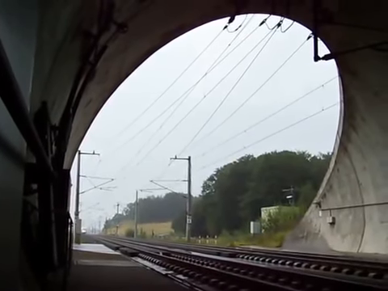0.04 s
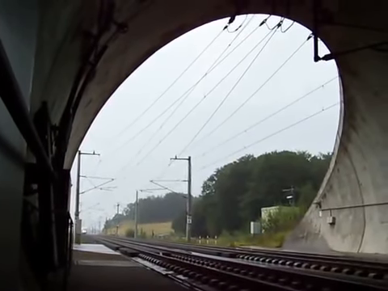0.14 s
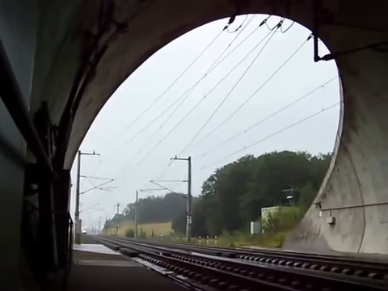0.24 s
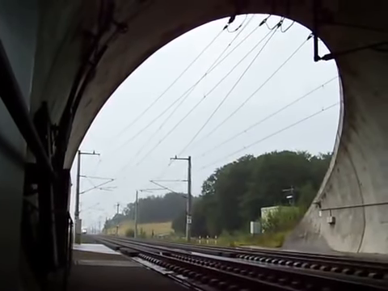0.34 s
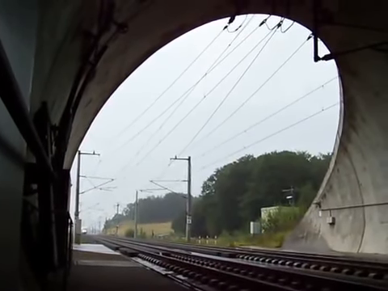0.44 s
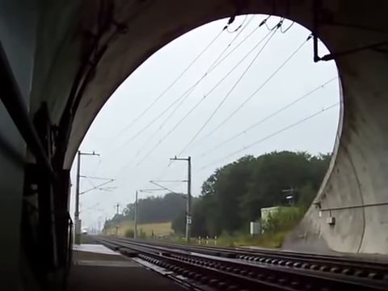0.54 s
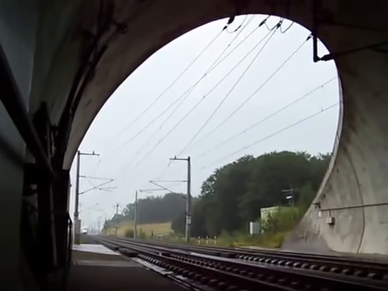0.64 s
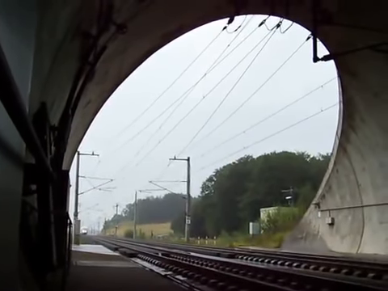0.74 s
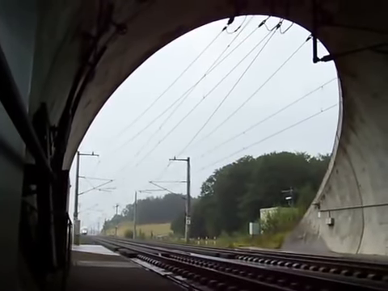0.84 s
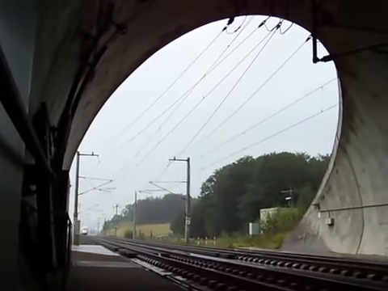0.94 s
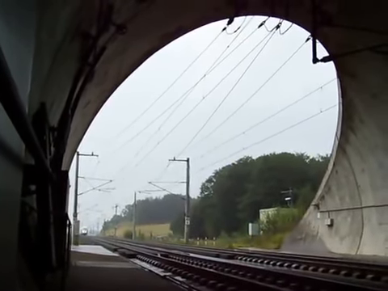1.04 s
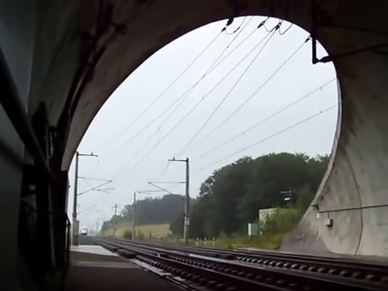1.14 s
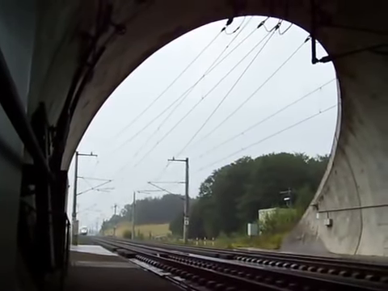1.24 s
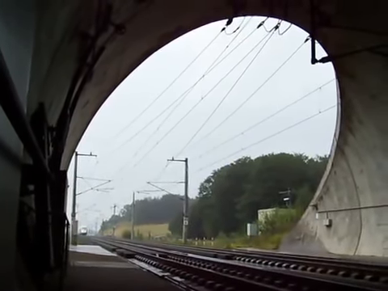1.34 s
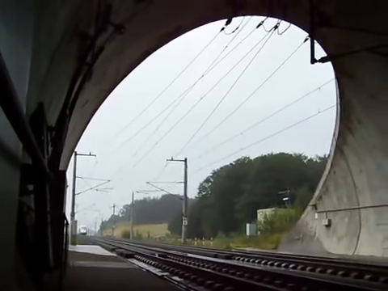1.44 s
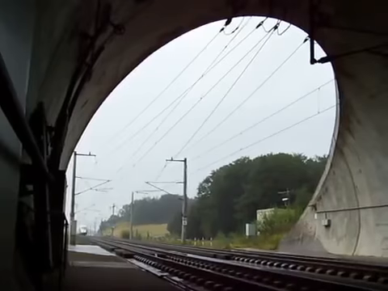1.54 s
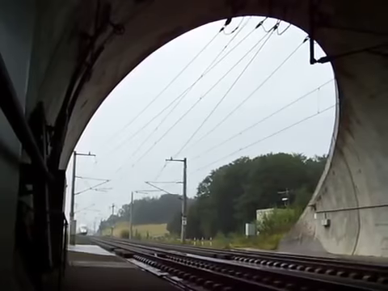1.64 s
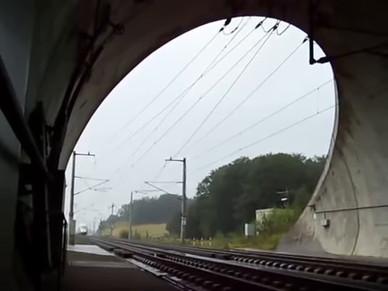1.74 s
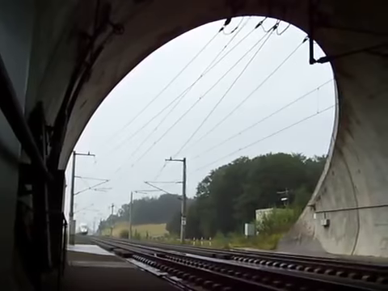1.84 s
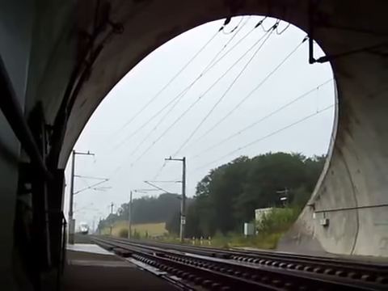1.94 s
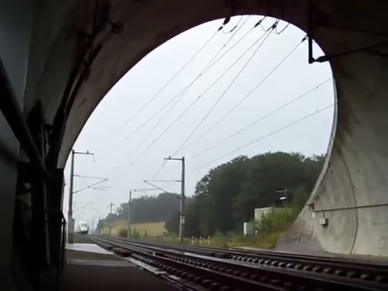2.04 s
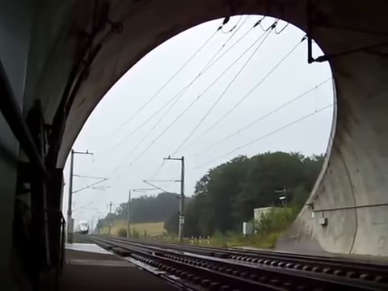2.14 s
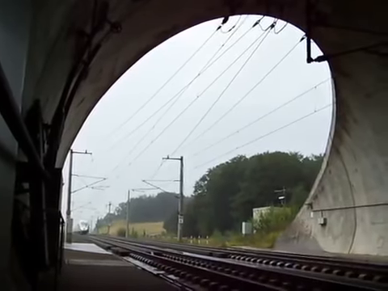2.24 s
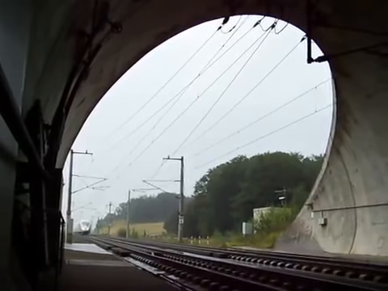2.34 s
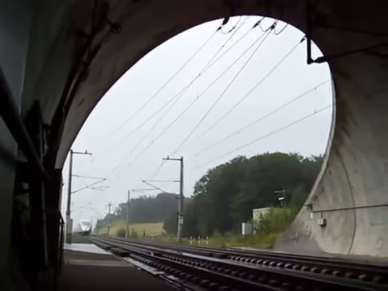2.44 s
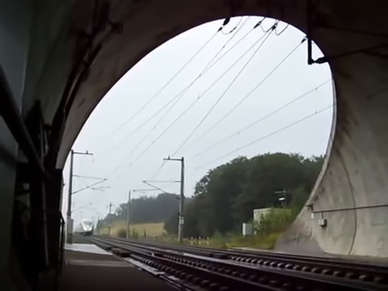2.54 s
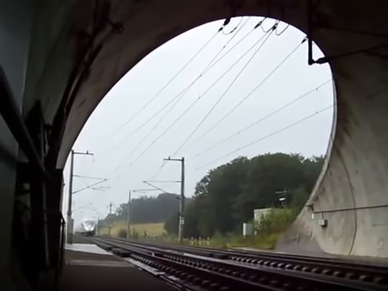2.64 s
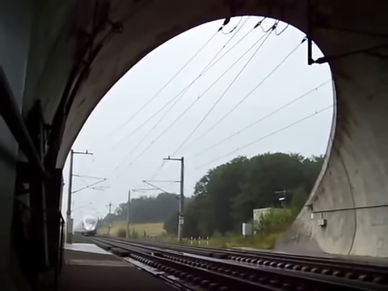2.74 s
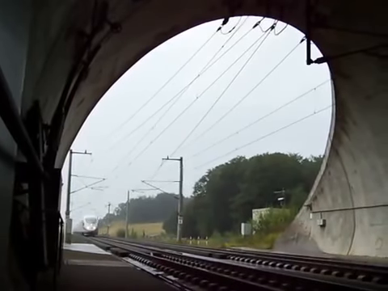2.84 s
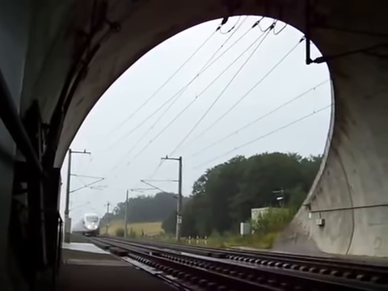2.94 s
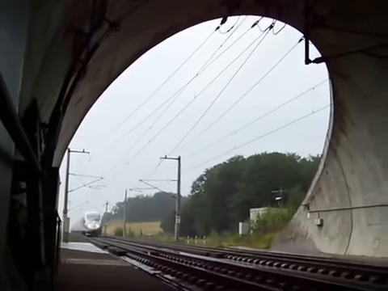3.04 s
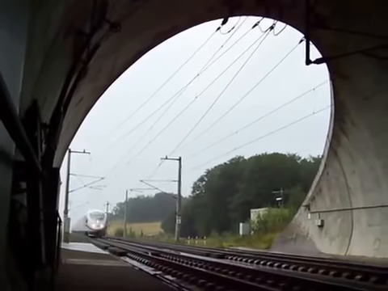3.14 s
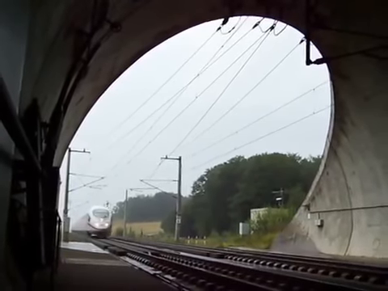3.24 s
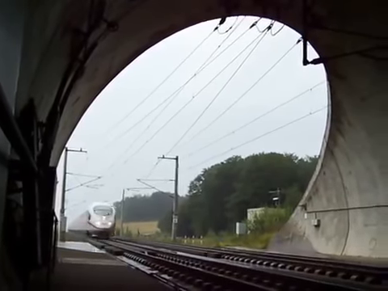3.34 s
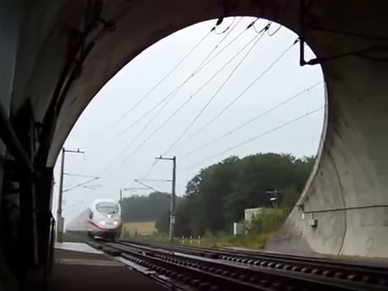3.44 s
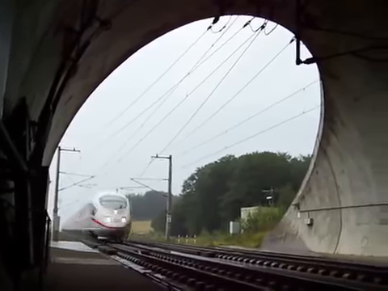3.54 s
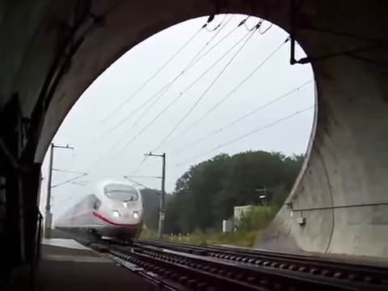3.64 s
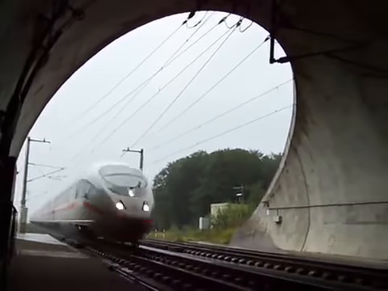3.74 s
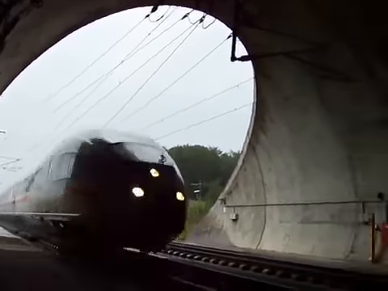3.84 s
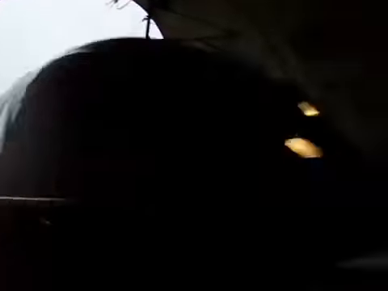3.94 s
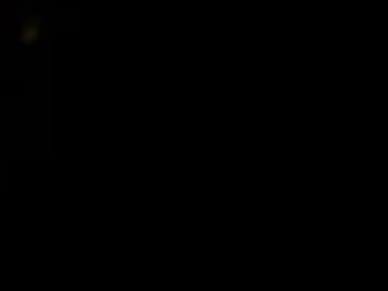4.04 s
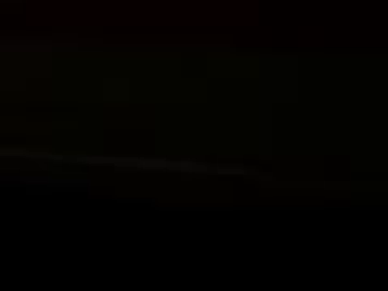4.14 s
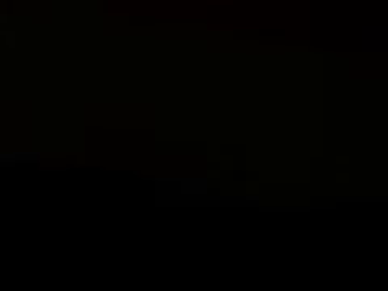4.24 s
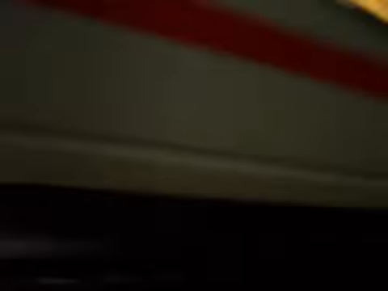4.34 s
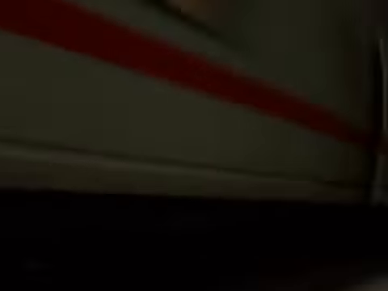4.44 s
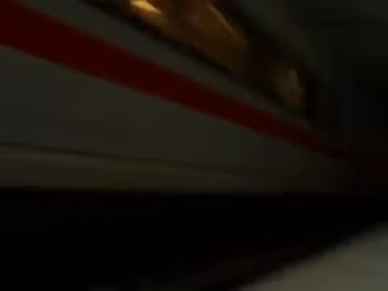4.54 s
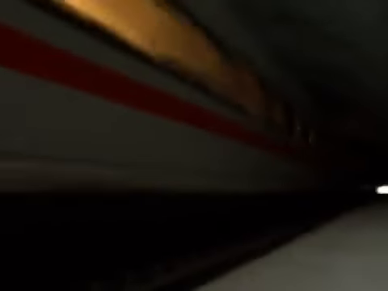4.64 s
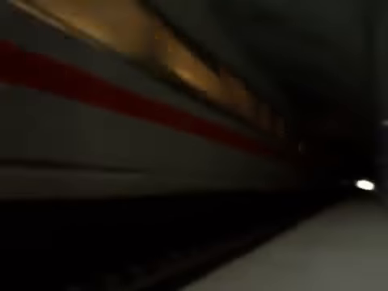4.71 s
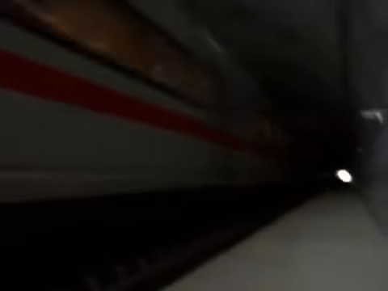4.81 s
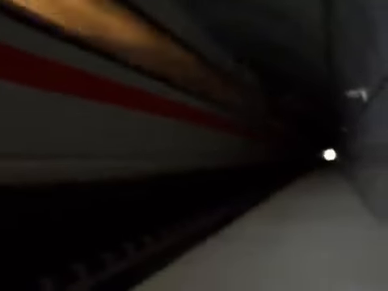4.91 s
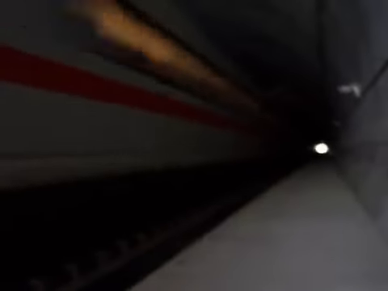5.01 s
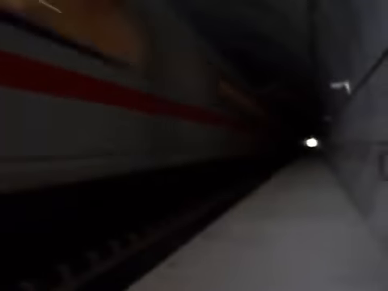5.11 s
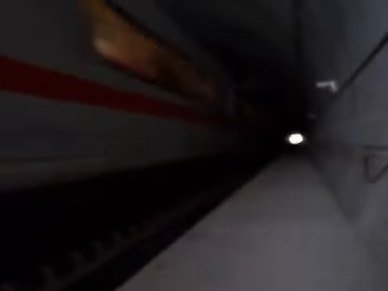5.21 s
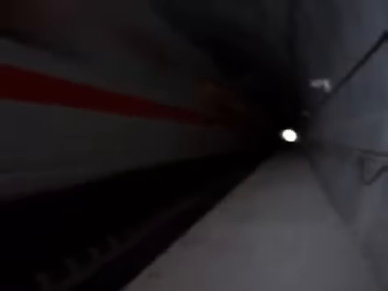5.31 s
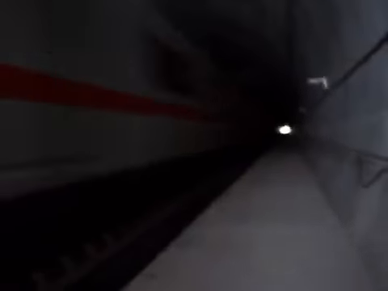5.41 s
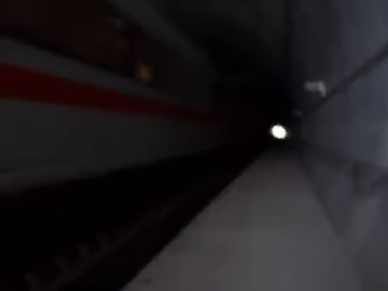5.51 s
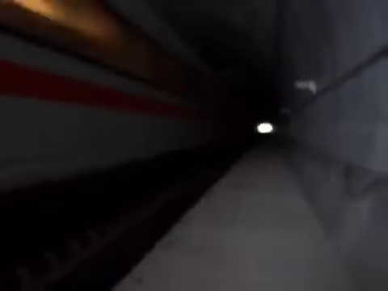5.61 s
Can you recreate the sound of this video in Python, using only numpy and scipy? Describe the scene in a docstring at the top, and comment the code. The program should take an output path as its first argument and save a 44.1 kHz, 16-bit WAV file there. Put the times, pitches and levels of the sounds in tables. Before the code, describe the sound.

Just inside a tunnel mouth, a faint deep breeze lies under a far train's throbbing bass, airy rush and thin rail hiss. A wavering whine grows as it nears. Wheel hiss cuts in sharply, dropping in pitch, with a low boom, then the nose bursts past just before four seconds. Pressure slaps, roar and lumpy wind overload the mono microphone until the end.

```python
"""A high-speed train races toward a tunnel mouth, heard from just inside, over a faint breeze of deep noise.
Throbbing bass noise, patchy air rush and hissing rails swell up, with narrow resonances of noise as a whine.
Wheel hiss breaks in, dropping in pitch, and a boom of low noise runs ahead of the nose.
The nose bursts in close by; pressure slaps, roar and lumpy slipstream overload the mono microphone to the end."""
import sys
import numpy as np
from scipy import signal
from scipy.fft import rfft, irfft, next_fast_len
from scipy.io import wavfile
from scipy.ndimage import uniform_filter1d, map_coordinates

SR = 44100
rng = np.random.default_rng(int(sys.argv[2]) if len(sys.argv) > 2 else 0)


def dump(signal):
    """Clip the signal to [-1, 1] and save it as 16-bit WAV at the path in sys.argv[1]."""
    limited = np.clip(np.atleast_2d(signal).T, -1, 1)
    pcm = np.round(limited * 32767).astype(np.int16)
    wavfile.write(sys.argv[1], SR, pcm)


N = 250047

# The run: the nose draws level at NOSE_S; from then on the nearest coach stays ASIDE_M away.
SPEED_M_PER_S, NOSE_S, ASIDE_M = 80, 3.95, 10


# Broad roar of the coaches in the bore: pitch_hz, relative density level_db.
ROAR_COLOUR = [(80, -11), (250, 1), (450, -1), (700, 0), (1100, -4.5), (2000, 0), (3000, 0.5), (3900, -4.5),
               (4500, -14.5), (7000, -21), (9000, -56)]


def coach_roar():
    """The coaches alongside fill the bore with patchy broadband noise."""
    level = swell(rise_db_per_s=59, full_s=4.0, held_db=9.3, sag_db_per_s=.3)
    return level * turbulent(ROAR_COLOUR, patchy_db=0.58)


# Hiss of the passing wheels: pitch_hz, relative density level_db.
WHEEL_COLOUR = [(1200, -11), (2400, -18.5), (3000, -0.5), (3400, 3.5), (3850, -1), (4400, -8), (7000, -26),
                (9000, -73)]
# Pitch drop of the hiss as the nose comes by: time_s, doppler_ratio (no unit).
WHEEL_DOPPLER = [(3.6, 1.11), (3.72, 1.06), (3.9, 1), (5.67, .98)]


def wheel_hiss():
    """Wheel noise is Doppler shifted by reading it at a changing speed; a thin whistle of the coaches joins it."""
    ratio = np.interp(clock(), *np.transpose(WHEEL_DOPPLER))
    emitted = np.cumsum(ratio)  # the sample of the hiss that arrives at each moment
    hiss = map_coordinates(turbulent(WHEEL_COLOUR, patchy_db=0.6), [emitted], mode="mirror")

    whistle_db = -17  # against the hiss
    whistle = line(centre_hz=3299, width_hz=4, steadiness=.4)
    hiss = hiss + amp(whistle_db) * fade_in(NOSE_S, rise_s=.2) * whistle

    # The hiss breaks in suddenly, ahead of the nose.
    break_in_s, hidden_db = 3.61, -14
    hidden = 1 - fade_in(break_in_s, rise_s=.03)
    level = swell(rise_db_per_s=48, full_s=3.955, held_db=7, sag_db_per_s=.2)
    return level * amp(hidden_db * hidden) * hiss


# Deep noise of air moving over the microphone: pitch_hz, relative density level_db.
WIND_COLOUR = [(8, -14.5), (22, -2), (45, -0.5), (75, -1.3), (120, -12), (250, -36.5), (600, -57.5),
               (1500, -120)]
# Gusts of the slipstream: peak_s, gain_db, half_width_s (time from the peak to 1/e of the dB gain).
WIND_GUSTS = [(4.05, 4, .06), (4.58, 4.5, .12), (4.9, 3, .08)]


def slipstream():
    """The coaches drag lumpy air over the microphone: wavering deep noise, lifted by gusts."""
    lumpy = unit(noise(WIND_COLOUR) * amp(0.3 * wobble(13)))
    gust_db = sum(gain_db * hump(peak_s, half_s) for peak_s, gain_db, half_s in WIND_GUSTS)
    level = swell(rise_db_per_s=95, full_s=3.92, held_db=3.8, sag_db_per_s=1.5)
    return level * amp(gust_db) * lumpy


# Slaps of the nose wave and its eddies: peak_s, pressure_full_scale (before overload), width_s (to exp(-2)).
PRESSURE_SLAPS = [(3.983, -2.5, .007), (4.034, 2.5, .004), (4.051, 11, .007), (4.145, -2.5, .004),
                  (4.33, 3.5, .005), (4.538, -4, .006), (4.695, -3, .006), (4.714, 3.5, .008),
                  (5.312, 2.5, .008), (5.379, 5, .006)]


def slaps():
    """Pressure pulses push the overloaded input to one side and choke the roar for an instant."""
    return sum(pressure * np.exp(-2 * ((clock() - peak_s) / width_s) ** 2)
               for peak_s, pressure, width_s in PRESSURE_SLAPS)


# Boom of the air in the bore: pitch_hz, relative density level_db.
BOOM_COLOUR = [(50, -22), (100, -5), (165, 0), (205, -4), (270, -10), (340, -32), (700, -70)]


def nose_boom():
    """The air shoved ahead of the nose makes the bore boom as the train enters."""
    level_db = 1.8
    return amp(level_db) * hump(at_s=3.85, half_s=.28) * noise(BOOM_COLOUR)


# Bass of the train before its moving upper edge: pitch_hz, relative density level_db.
RUMBLE_COLOUR = [(10, -44), (25, -11.5), (55, 0), (100, 1), (150, 1.5), (260, -.5), (450, 0), (900, -74)]


def rumble():
    """The bore booms with the train's throbbing bass, whose steep upper edge climbs on the way in."""
    behind = fade_in(NOSE_S, rise_s=.2)  # 1 once the nose is in the bore

    aside_edge_hz, behind_edge_hz = 295, 250
    fall_octaves = .215  # per doubling of distance
    ahead_edge_hz = aside_edge_hz * (ASIDE_M / distance()) ** fall_octaves
    edge_hz = (1 - behind) * ahead_edge_hz + behind * behind_edge_hz

    hz, frame_s, bands = signal.stft(noise(RUMBLE_COLOUR), SR, nperseg=4096)
    edge = 1 / np.sqrt(1 + (hz[:, None] / np.interp(frame_s, clock(), edge_hz)) ** 22)
    bass = unit(signal.istft(bands * edge, nperseg=4096)[1][:N])

    behind_db = 6.5  # extra level behind the nose
    throb_db = 0.9 * wobble(14)
    return carried(near_db=-6.5, spread_db=4.2) * amp(behind_db * behind + throb_db) * bass


# Air rushing round the train: pitch_hz, relative density level_db.
RUSH_COLOUR = [(150, -8), (280, 3.5), (400, 1), (540, 2.5), (680, -0.5), (900, -2), (1400, -0.5), (2000, 0),
               (2800, -1.5), (4000, -6.5), (5000, -19.5), (7500, -32), (9000, -80)]
# Wheel hiss carried by the rails: pitch_hz, relative density level_db.
RAIL_COLOUR = [(900, -56), (2000, -16.5), (2700, -5.5), (3250, 0.5), (3900, -0.3), (4400, -9.5),
               (5200, -18), (6200, -22), (7500, -32), (9000, -56)]


def approach():
    """Air rushes round the far train, while the rails carry the hiss of its wheels ahead."""
    rush = carried(near_db=-16.2, spread_db=3.2, loss_db_per_m=.032) * turbulent(RUSH_COLOUR, patchy_db=1.4)
    rails = carried(near_db=-8.3, spread_db=4.4, loss_db_per_m=.055) * turbulent(RAIL_COLOUR, patchy_db=0.8)
    return rush + rails


# Lower whine: pitch_hz, half_width_hz (of each resonance, to half gain), relative level_db.
LOW_WHINE_LINES = [(368, 10, -5), (420, 22, -3), (627, 9, 0.5)]
# Higher whine: pitch_hz, half_width_hz (of each resonance, to half gain), relative level_db.
HIGH_WHINE_LINES = [(450, 25, -11), (665, 4, -1), (690, 30, -3.5), (769, 30, -8.5), (1957, 30, -13)]


def whine():
    """Two groups of lines from the running gear; the higher takes over as the train nears."""
    low = carried(near_db=-37, spread_db=1.6) * chord(LOW_WHINE_LINES, steadiness=.2)
    high = carried(near_db=-15.5, spread_db=5.2) * chord(HIGH_WHINE_LINES, steadiness=0.43)
    high = high * fade_in(2.05, rise_s=.5)
    return (low + high) * (1 - fade_in(3.7, rise_s=.25))  # both die away as the nose arrives


def ambience():
    """Faint wind drones across the tunnel mouth all the time and swells once."""
    steady_db, swell_db = -31.5, 7.5
    return amp(steady_db + swell_db * hump(at_s=2.1, half_s=.5)) * noise(WIND_COLOUR)


def distance():
    """Metres from the microphone to the nearest part of the train."""
    return np.hypot(SPEED_M_PER_S * np.maximum(NOSE_S - clock(), 0), ASIDE_M)


def carried(near_db, spread_db, loss_db_per_m=0):
    """Gain from near_db at ASIDE_M, less spread_db per doubling of distance and a loss along the way."""
    metres = distance()
    spreading_db = spread_db * np.log2(metres / ASIDE_M)
    loss_db = loss_db_per_m * (metres - ASIDE_M)
    opening_db = -3.7 * (1 - fade_in(.35, rise_s=.12))  # the first moments are quieter
    return amp(near_db - spreading_db - loss_db + opening_db)


def swell(rise_db_per_s, full_s, held_db, sag_db_per_s):
    """Gain that climbs steeply to its full level, then holds with a slow sag."""
    t = clock() - full_s
    return amp(held_db + rise_db_per_s * np.minimum(t, 0) - sag_db_per_s * np.maximum(t, 0))


def hump(at_s, half_s):
    """A bell-shaped rise and fall that reaches 1 at at_s."""
    return np.exp(-((clock() - at_s) / half_s) ** 2)


def fade_in(at_s, rise_s):
    """A smooth step from 0 to 1, halfway at at_s."""
    return .5 + .5 * np.tanh(2 * (clock() - at_s) / rise_s)


def clock():
    """The time of every sample in seconds."""
    return np.arange(N) / SR


def wobble(rate):
    """A smooth random curve, rate knots a second."""
    knots = rng.standard_normal(int(N * rate / SR) + 4)
    return map_coordinates(knots, [np.arange(N) * rate / SR])


def amp(db):
    """Decibels to gain."""
    return 10 ** (np.asarray(db) / 20)


def unit(x):
    """x at rms 1."""
    return x / np.sqrt(np.mean(x ** 2) + 1e-20)


def filtered(x, response):
    """x times a response of frequency."""
    size = next_fast_len(N + 8192)
    return irfft(rfft(x, size) * response(np.fft.rfftfreq(size, 1 / SR)), size)[:N]


def colour(points, hz):
    """Gain at hz from (pitch_hz, level_db) points on a log axis."""
    point_hz, level_db = np.transpose(points)
    return amp(np.interp(np.log(hz + 1), np.log(point_hz), level_db))


def noise(spectrum):
    """Noise of rms 1 with the given colour."""
    return unit(filtered(rng.standard_normal(N), lambda hz: colour(spectrum, hz)))


def turbulent(spectrum, patchy_db):
    """Coloured noise of rms 1 whose bands swell and fade in patches."""
    bands = signal.stft(noise(spectrum), nperseg=1024)[2]
    patches = uniform_filter1d(rng.standard_normal(bands.shape), size=9, axis=0)  # across pitch
    patches = uniform_filter1d(patches, size=10, axis=1)  # along time
    return unit(signal.istft(bands * amp(patchy_db * unit(patches)), nperseg=1024)[1][:N])


def line(centre_hz, width_hz, steadiness):
    """A wavering tone of rms 1: noise in one narrow resonance, whose fades are shallower the steadier it is."""
    resonance = filtered(rng.standard_normal(N), lambda hz: 1 / (1 + ((hz - centre_hz) / width_hz) ** 2))
    analytic = signal.hilbert(resonance)
    envelope = np.abs(analytic) + 1e-12
    return unit(analytic.real / envelope ** np.clip(steadiness, 0, 1))


def chord(lines, steadiness):
    """Several wavering tones mixed to rms 1."""
    return unit(sum(amp(level_db) * line(pitch_hz, width_hz, steadiness)
                    for pitch_hz, width_hz, level_db in lines))


def saturate(x, top, hardness):
    """Flatten the wave as it nears top."""
    return x / (1 + np.abs(x / top) ** hardness) ** (1 / hardness)


def scene():
    """All sources at one microphone, on both channels."""
    passing = coach_roar() + wheel_hiss() + slipstream() + slaps()
    air = passing + nose_boom() + rumble() + approach() + whine() + ambience()
    return np.array([air, air])


# Tone of the output stage: pitch_hz, gain_db.
OUTPUT_COLOUR = [(7000, -0.5), (8500, -3), (11000, -5), (12600, -3.5), (14800, -7.5), (15200, -10)]


def record(dry):
    """The narrow-band input clips hard; its steep filter rings, and the overshoot is clipped again at the output."""
    clipped = saturate(dry[0], top=0.75, hardness=4.5)
    input_hz = 7990
    steep = signal.ellip(8, .3, 70, input_hz, fs=SR, output="sos")  # ripple and stopband in dB
    limited = np.clip(signal.sosfilt(steep, clipped), -.7, .7)

    top_hz, skirt_hz = 15850, 300  # the treble slopes to nothing at top_hz
    out = filtered(limited, lambda hz: colour(OUTPUT_COLOUR, hz) * np.clip((top_hz - hz) / skirt_hz, 0, 1))
    return np.array([out, out])


dry = scene()
out = record(dry)
dump(out)
```